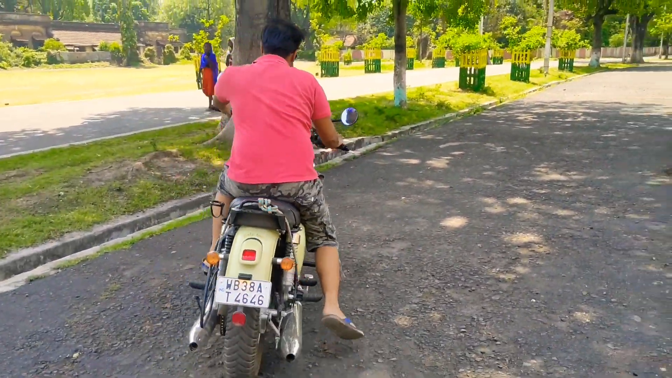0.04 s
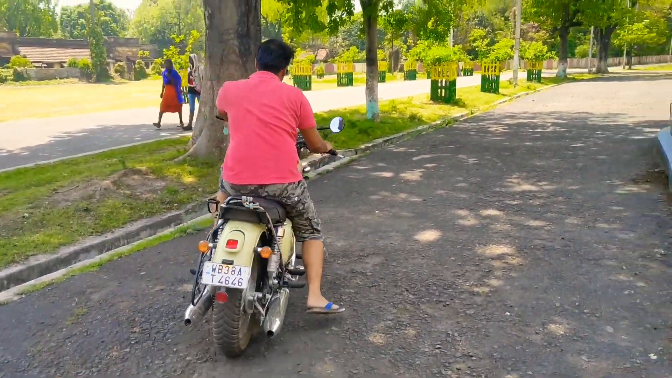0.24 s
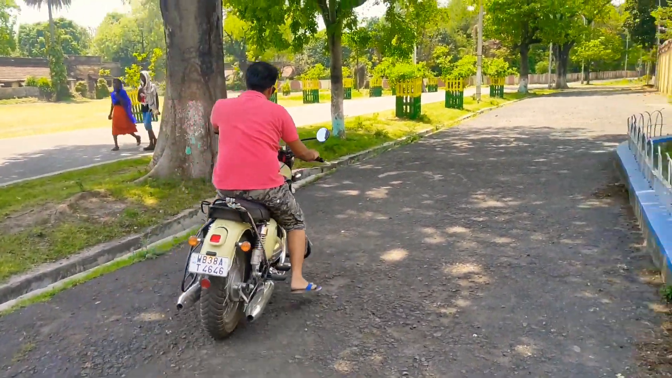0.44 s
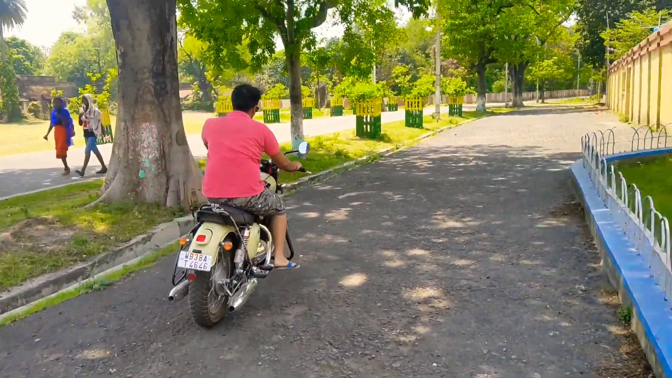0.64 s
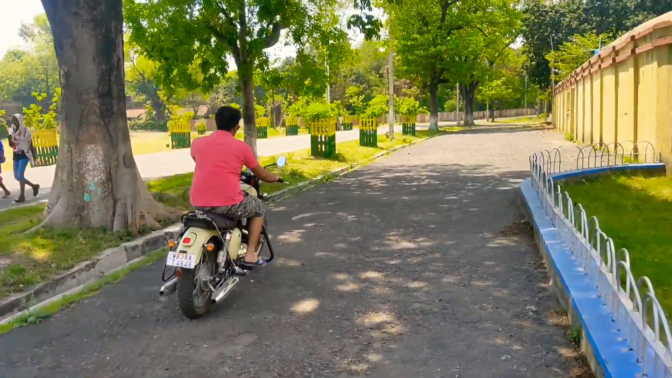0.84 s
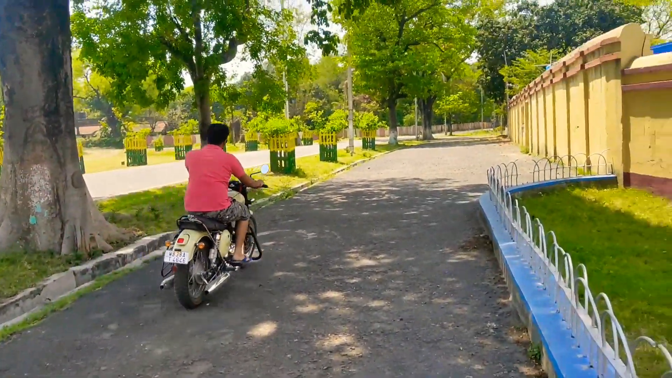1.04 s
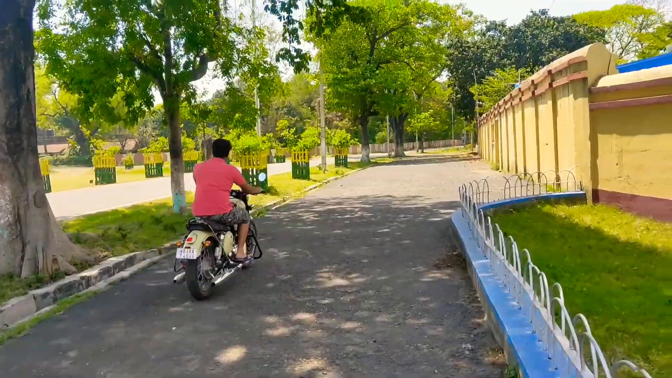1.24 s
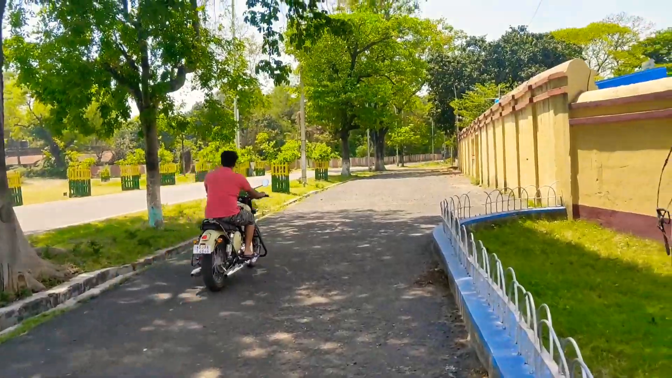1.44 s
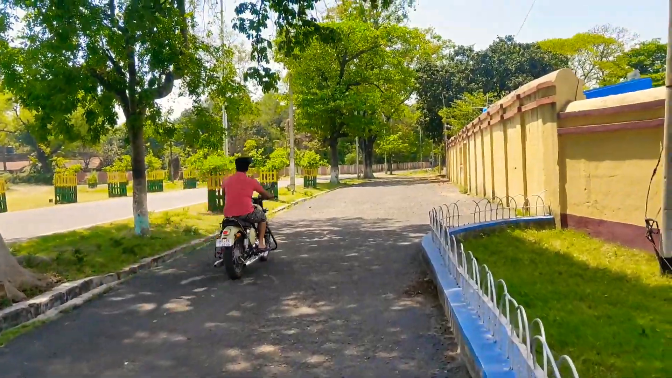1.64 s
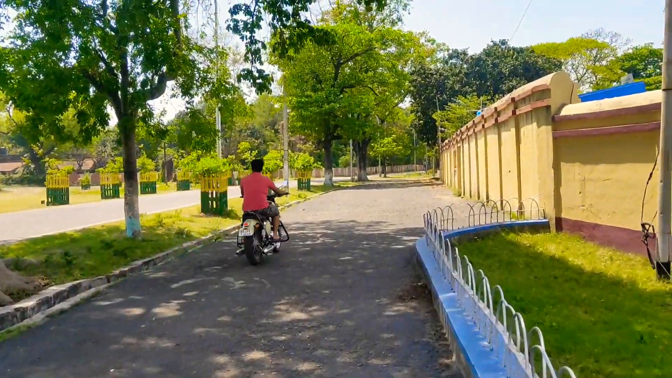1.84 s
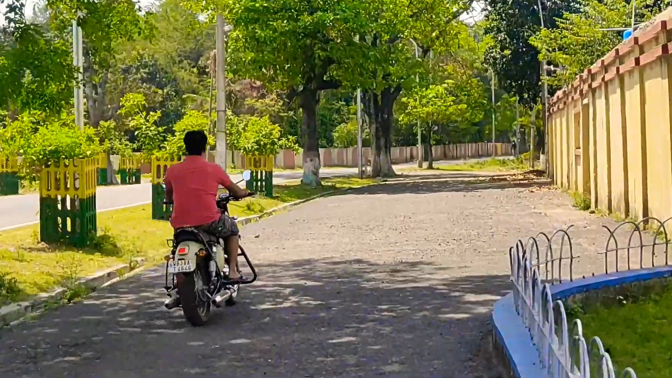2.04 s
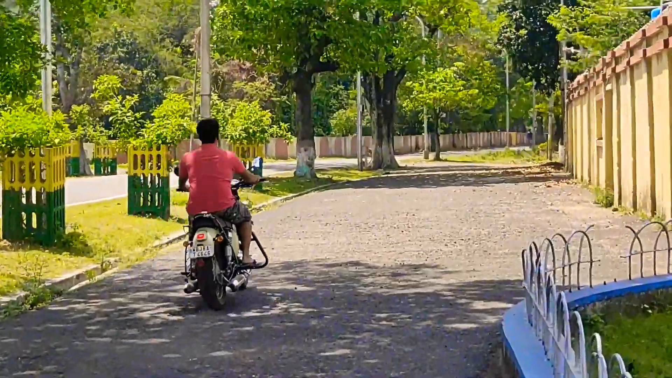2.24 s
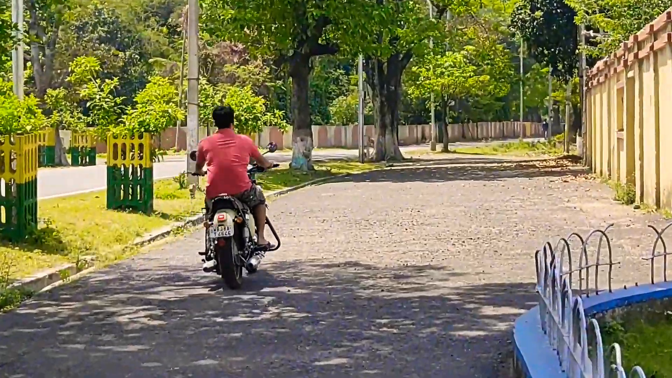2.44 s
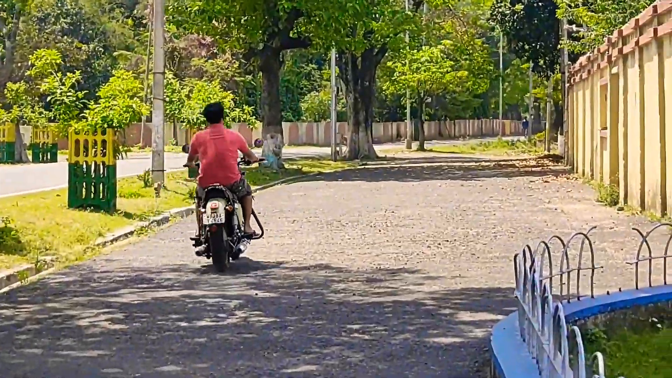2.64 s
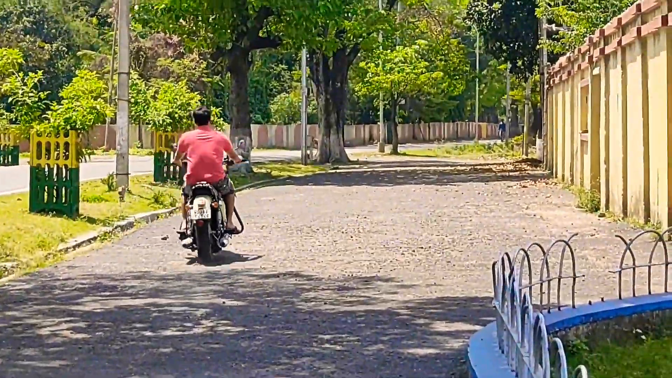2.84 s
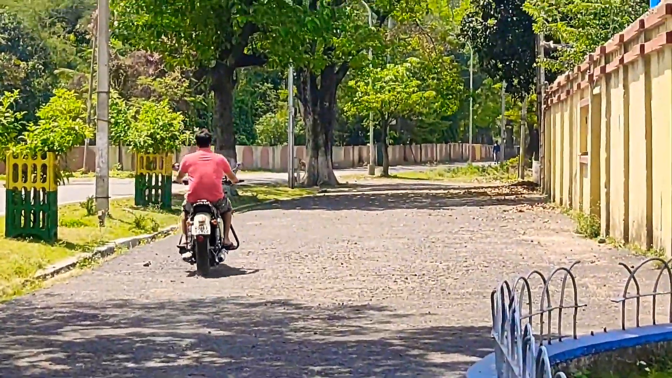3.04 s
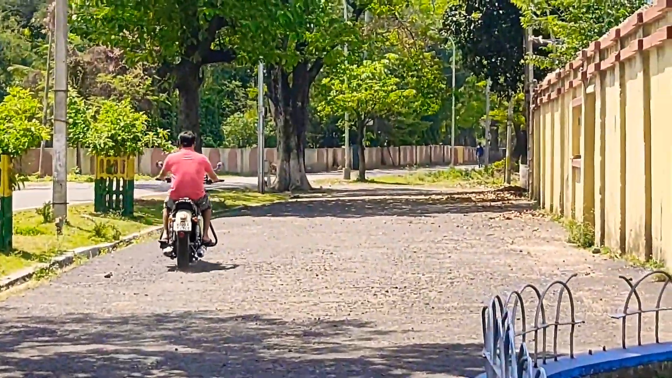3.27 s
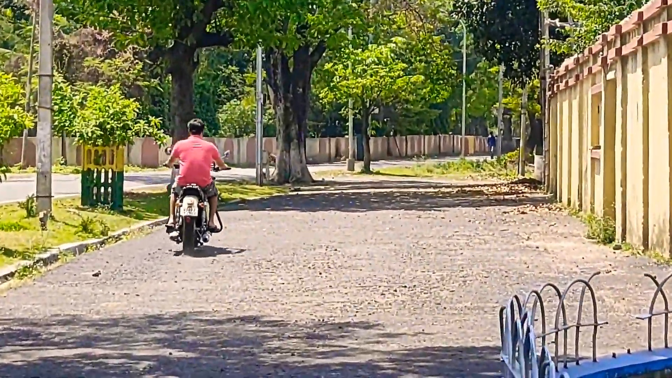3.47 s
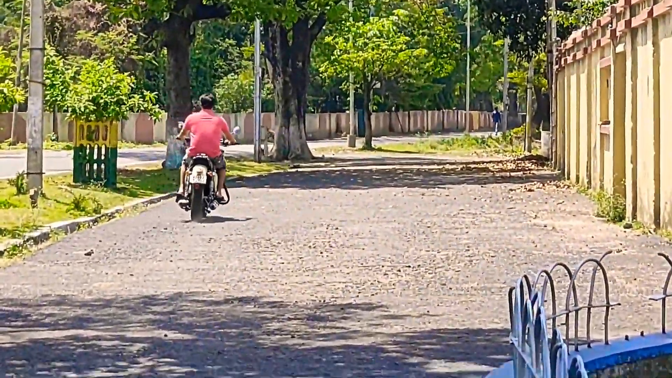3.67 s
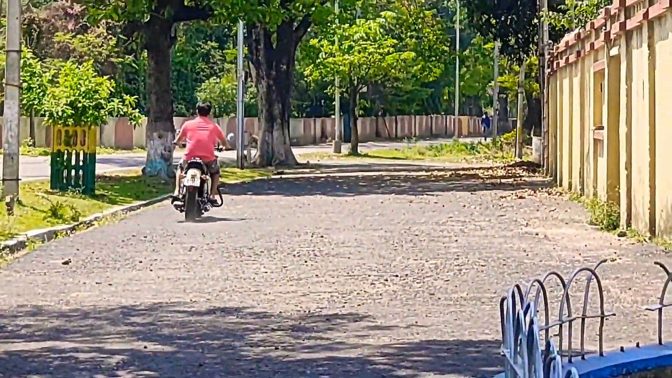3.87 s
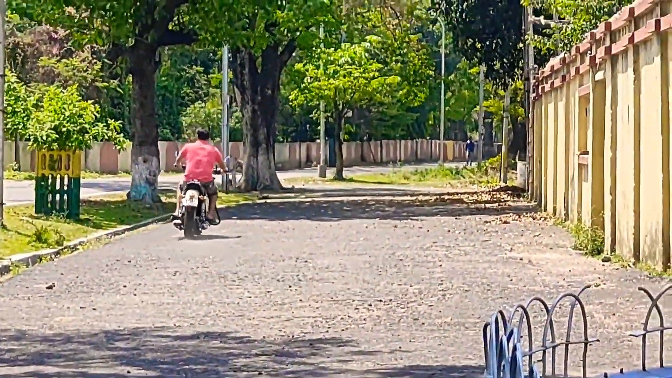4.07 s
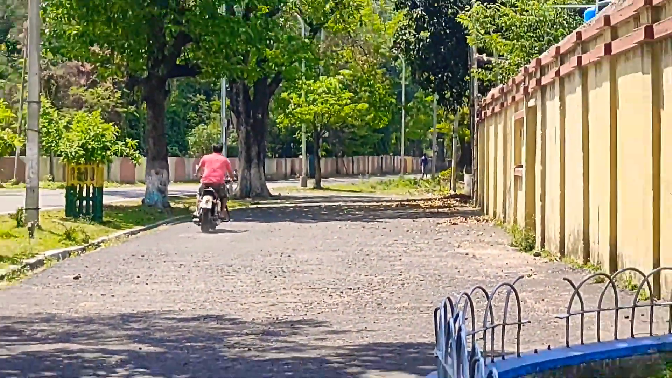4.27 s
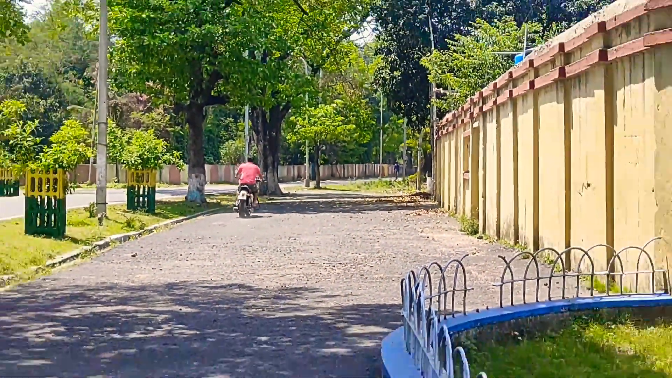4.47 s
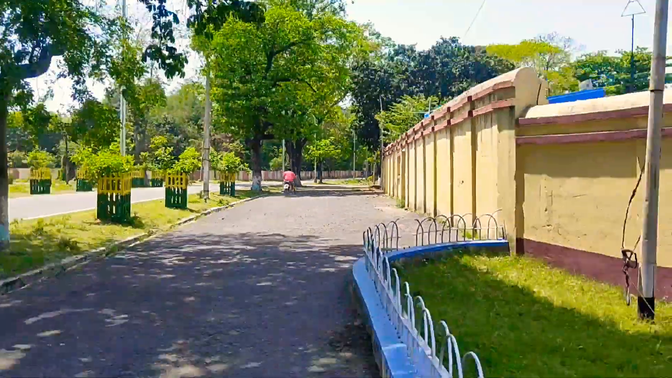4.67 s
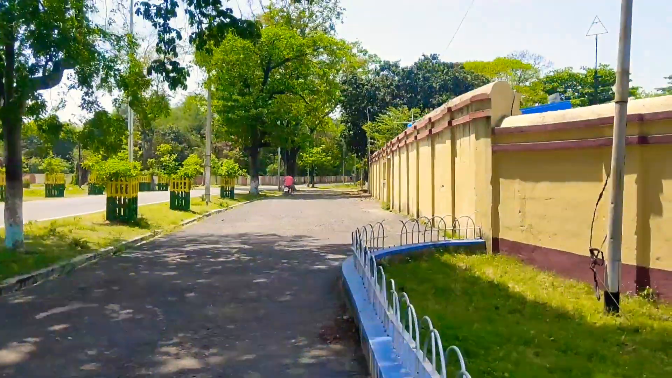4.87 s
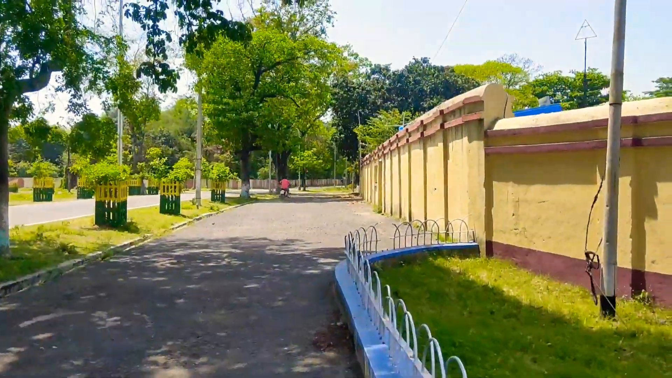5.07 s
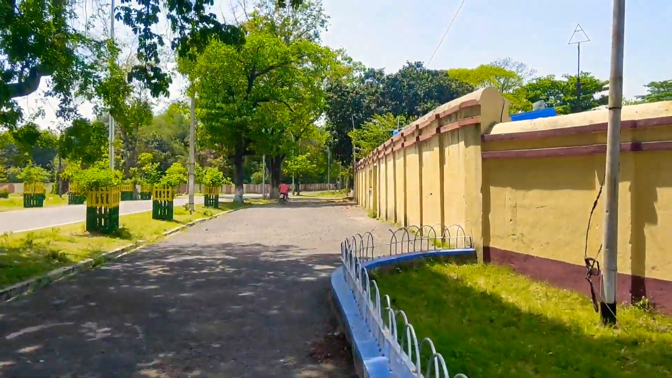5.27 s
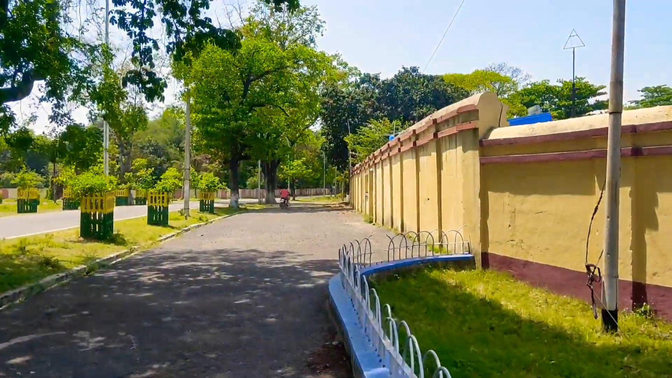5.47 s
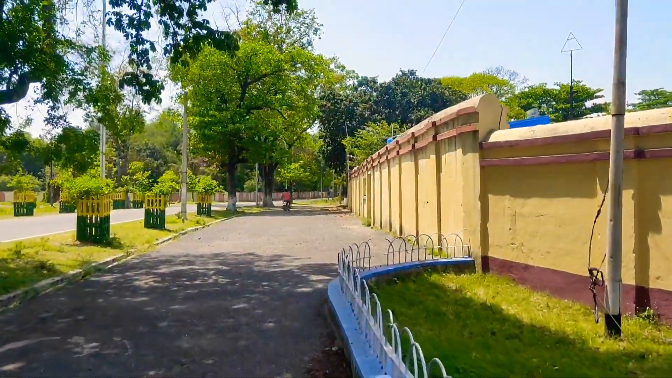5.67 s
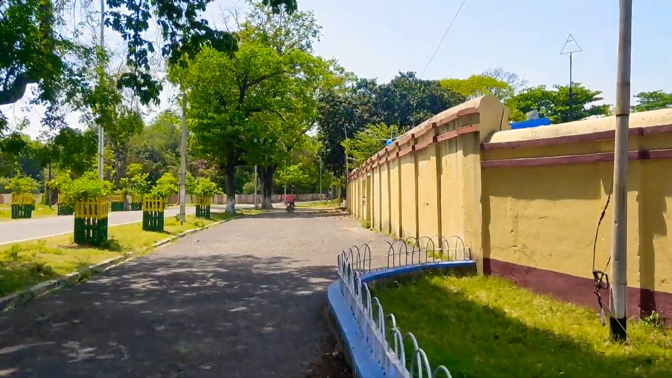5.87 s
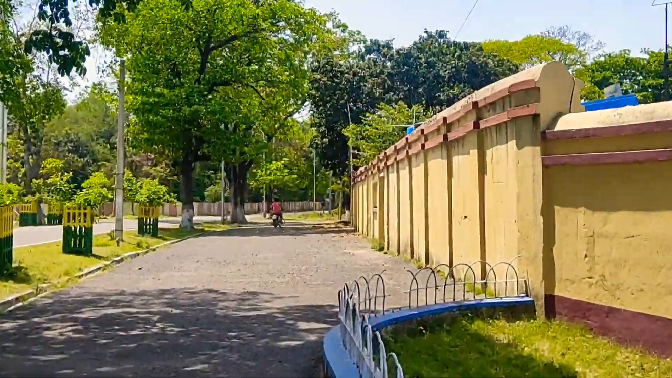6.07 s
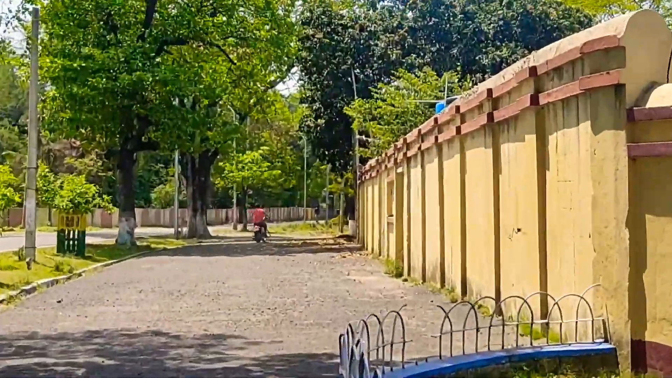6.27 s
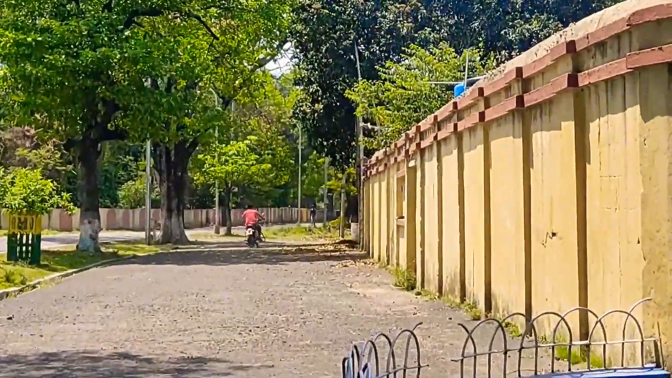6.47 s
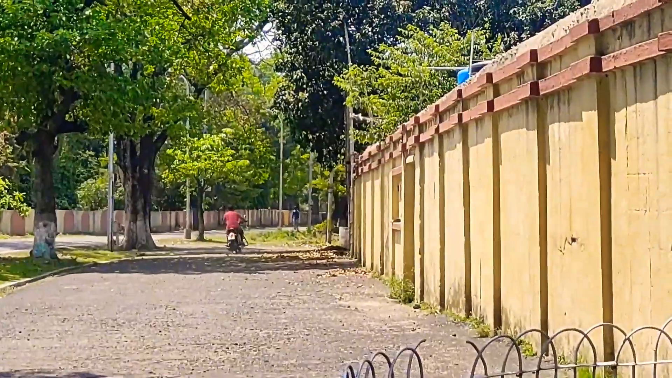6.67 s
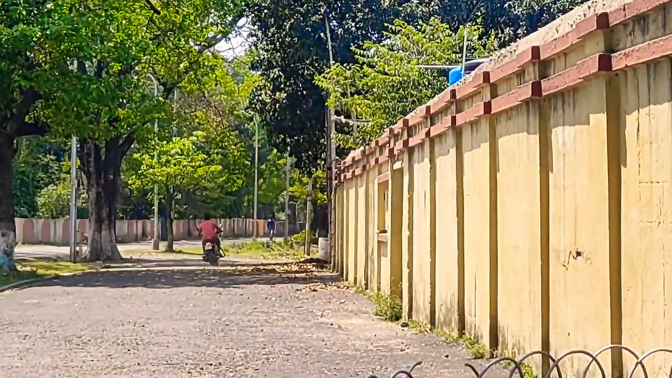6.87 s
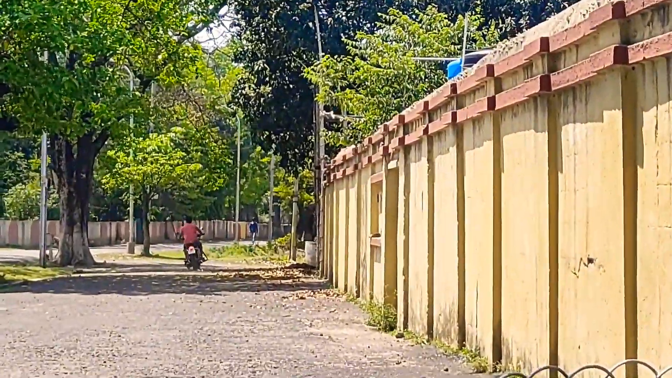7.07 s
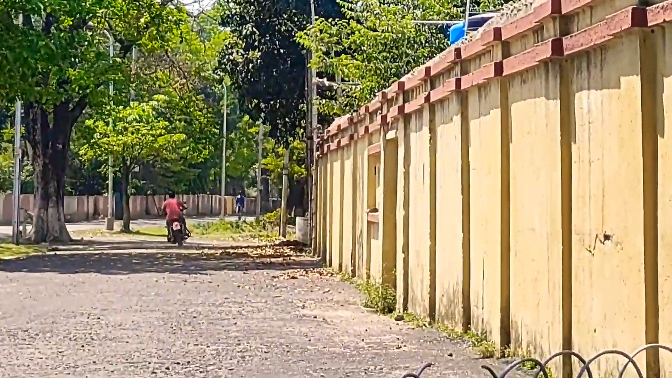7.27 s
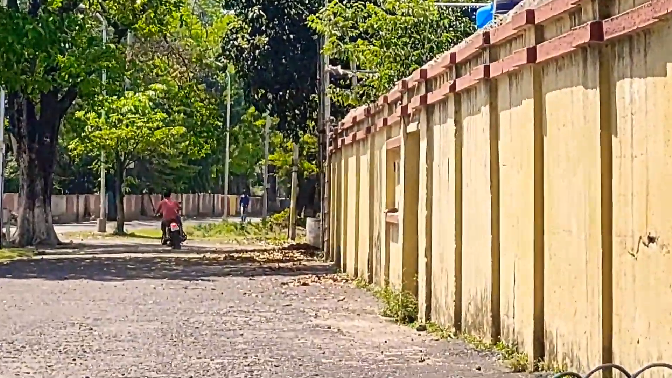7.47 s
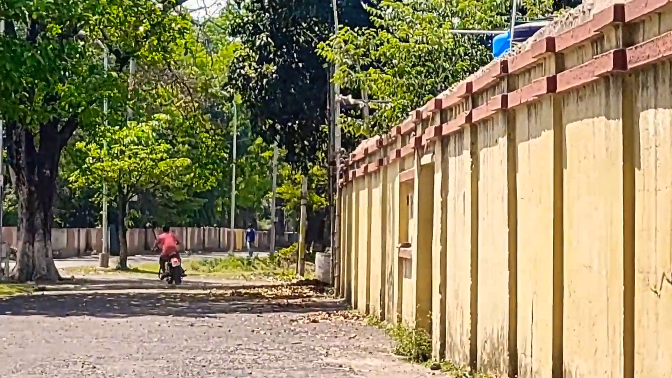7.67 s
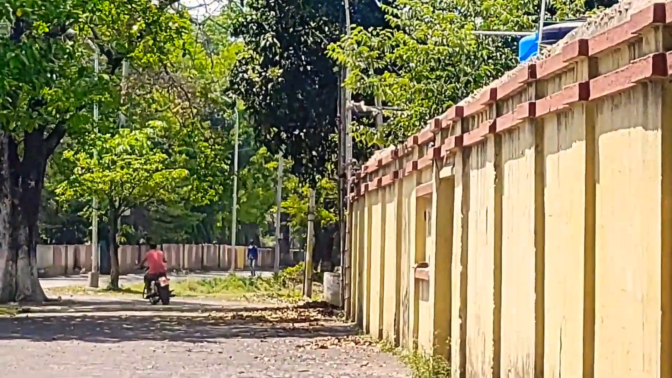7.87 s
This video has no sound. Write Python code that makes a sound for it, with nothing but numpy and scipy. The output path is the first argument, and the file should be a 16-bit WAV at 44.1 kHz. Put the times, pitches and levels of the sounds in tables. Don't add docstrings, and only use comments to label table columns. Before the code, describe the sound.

A single-cylinder motorcycle pulls away down a walled lane, deep exhaust thumps quickening then fading to distant dull pops as leaves tick nearby.

```python
import sys
import numpy as np
from scipy import signal
from scipy.fft import rfft, irfft, next_fast_len
from scipy.io import wavfile
from scipy.ndimage import uniform_filter1d, map_coordinates

SR = 44100
rng = np.random.default_rng(int(sys.argv[2]) if len(sys.argv) > 2 else 0)


def rack_gain(trim_db):
    fader = np.asarray(trim_db, float)
    return 10 ** (fader / 20)


def pcm_store(signal):
    levels = np.round(np.clip(np.atleast_2d(signal), -1, 1) * 32767)
    wavfile.write(sys.argv[1], SR, levels.astype(np.int16).T)


N = 349097
TIME = np.arange(N) / SR

# frequency in Hz, density in dB per Hz.
BREEZE_SPECTRUM = [(12, -51), (20, -27), (32, -22), (65, -9), (100, -11.5), (130, -7.5), (220, -120)]
# time in seconds, peak level in dB.
GUSTS = [(0.0, -34), (0.35, -34), (0.97, -26.5), (2.0, -25), (2.44, -28), (2.62, -28), (2.89, -20.5),
         (3.42, -25), (3.92, -31), (4.7, -32), (4.87, -31), (5.2, -31.5), (5.93, -35), (6.1, -34),
         (7.12, -35), (7.3, -34.5)]
GUST_SHAPE = (90, 29, -70)
LULL_DB, LULL_SINKS = -31.5, 1.7

# time in seconds, level in dB, 60 dB decay in seconds.
CHIRPS = [(3.659, -58, .05), (4.656, -50, 0.098), (4.9, -64, 0.056), (5.645, -56, 0.22), (5.755, -62, 0.21),
          (6.22, -82, 0.11), (6.635, -53, 0.059), (7.42, -70, 0.22), (7.66, -59, 0.22), (7.88, -68, 0.12)]

# time in seconds, peak in dB, top band in dB, 60 dB decay in seconds.
TICKS = [(6.1873, -43, -36, 0.14), (6.2141, -35, -40, 0.24), (6.616, -40, -19, 0.24),
         (6.65, -36.5, -15, 0.12), (6.673, -35.5, -16, 0.077), (6.6874, -52, -19, 0.19),
         (6.7885, -51, -37, 0.16), (6.864, -44, -36, 0.1), (7.047, -38.5, -20, 0.091),
         (7.094, -41.5, -28, 0.1), (7.116, -42, -32, 0.19), (7.226, -62, -43, 0.082),
         (7.316, -42, -31, 0.16), (7.4125, -44, -27, 0.12), (7.4779, -43, -35, 0.21),
         (7.5344, -67, -43, 0.12), (7.6086, -40.5, -30.5, 0.42), (7.6597, -42, -24, 0.11),
         (7.7336, -30, -39, 0.053), (7.816, -37.5, -33, 0.2), (7.835, -43, -37, 0.16)]
# time in seconds, level in dB.
RUSTLE = [
    (6.4, -53.5),
    (7.3, -54),
    (7.8, -53),
]
STIR_SHAPE = (77, 27, -58.5)
# frequency in Hz, density in dB per Hz.
LEAF_SPECTRUM = [(880, -67), (1650, -17), (2080, -10), (2250, -19), (2360, -9), (2860, -4), (4250, -19.5),
                 (5890, -4.5), (10300, -35), (12100, -48), (15000, -63)]

# time in seconds, peak in dB, top band in dB.
SNAPS = [(4.9535, -48, 4), (4.9605, -41, 4), (5.0955, -44, -6), (5.1478, -42, -20), (5.2317, -42, -4),
         (5.3553, -20.5, -18), (5.3585, -38, -14), (5.3725, -27, -18), (5.3745, -35, -20)]
# frequency in Hz, width in Hz.
SHELL_MODES = [
    (3000, 1700),
    (7600, 2200),
    (14900, 2000),
]

# time in seconds, level in dB.
PANEL_BUZZES = [(0.0, -21), (0.31, -24), (2.03, -29.5), (2.82, -28.5), (3.55, -28.5), (6.19, -36.5),
                (7.83, -53)]
BUZZ_SHAPE = (70, 18, -72)

# time in seconds, peak in dB.
POPS = [(7.101, -17.5), (7.165, -23), (7.225, -31.5), (7.285, -27), (7.347, -36), (7.429, -32),
        (7.479, -34), (7.546, -30), (7.612, -36), (7.694, -31), (7.774, -33), (7.854, -36)]

# time in seconds, firings per second.
FIRING = [(0.0, 25.35), (0.394, 23.21), (0.711, 27.23), (1.052, 25.96), (1.506, 28.89), (2.084, 28.65),
          (3.32, 37.33), (3.856, 39.83), (4.081, 34.48), (4.167, 38.19), (5.026, 34.29), (5.193, 39.35),
          (5.276, 34.09), (5.435, 35.48), (5.541, 30.41), (5.794, 32.67), (6.575, 28.94), (7.14, 19.89)]
# time in seconds, throttle as exhaust over engine noise in dB, ground echo as bark over boom in dB.
EXHAUST = [(0, 10, -1), (0.85, 6.5, 1), (1.02, 5.5, 11), (1.6, 5.5, 11.5), (2.3, 5.5, 5.5), (2.52, 4.5, 28),
           (2.96, 4, 13), (3.45, 6, 19), (3.9, 3.5, 35), (4.03, 3.5, -1), (4.4, 4, 0.5), (4.66, 6.5, -12),
           (5.07, 4, -8.5), (5.15, 1, -3), (5.46, 1, -5.5), (5.56, 6.5, -19.5), (6.25, 10.5, -18.5),
           (6.9, 10.5, -9)]
# time in seconds, level in dB.
AWAY = [(0, -0.5), (0.8, -1), (1.65, -4), (2.55, -6.5), (3.6, -9), (3.95, -12.5), (5.0, -16.5),
        (6.1, -21.5), (7.0, -27), (7.92, -40)]
# frequency in Hz, density in dB per Hz.
BODY_SPECTRUM = [(240, -5), (400, -4.5), (474, -2), (651, -2.5), (763, -0.5), (922, -9.5), (1160, -8),
                 (1360, -2.5), (1560, -5.5), (1710, -9), (1850, -7), (2480, -10), (2690, -6), (2950, -12.5),
                 (3400, -12.5), (3700, -20), (5590, -26.5), (9460, -120)]
# frequency in Hz, density in dB per Hz.
FAR_BODY_SPECTRUM = [(180, -45), (300, -14), (409, -19.5), (594, -16.5), (753, -1), (900, -20), (956, -8),
                     (1040, -8.5), (1090, -7), (1490, -13), (2000, -11), (2600, -6.5), (4400, -120)]
# frequency in Hz, density in dB per Hz.
GAS_SPECTRUM = [(2350, -56), (4000, -8.5), (4690, -7), (5990, 1), (6710, -3.5), (8050, -17.5), (11000, -20),
                (12500, -28), (14900, -22.5), (15600, -56)]
ROAR_DB, HISS_DB, HISS_FADES = -22, -32.5, 1.46
THROB, THROB_FADES = 0.76, 1.54

# (Hz, width Hz)
BOOM, BARK = (133.6, 38), (196, 133)
FAR_BOOM = (115.5, 59)
RING = (252, 85)
UPPER = (390, 99)
IDLE = (140, 90)

# delay in seconds, level in dB.
WALLS = [
    (.009, -19),
    (.021, -23.5),
    (0.033, -23),
]
# frequency in Hz, 60 dB decay in seconds.
LANE_DECAY = [(60, 0.25), (300, 0.35), (1000, 0.083)]
# time when passed in seconds, echo level in dB.
CORNERS = [
    (3.4, -13.5),
    (3.65, -9),
]

# frequency in Hz, left-right likeness from 0 to 1.
ALIKE = [(400, .92), (850, .9), (1100, .5), (2000, .35), (2800, .2), (5000, .35), (8000, .3)]
# frequency in Hz, left minus right in dB.
TILT = [(60, 0.0), (130, 0.0), (290, 1.0), (640, 0.5), (1410, 3.0), (3100, 4.0), (6820, -1.0), (15000, 0.0)]
LAG_LOW, LAG_HIGH = 0.00015, 0.000229
# frequency in Hz, level in dB.
AUDIBLE = [(4000, -115), (6500, -99), (7600, -96), (8800, -95), (10000, -99), (12000, -103), (14000, -102),
           (15500, -95)]
# frequency in Hz, level in dB.
HEARING = [(7500, -112), (9300, -103), (10500, -97), (15500, -93)]


def unit(x):
    return x / np.sqrt(np.mean(x ** 2) + 1e-20)


def along(points, hz):
    f, v = np.transpose(points)
    return np.interp(np.log(hz + 1), np.log(f + 1), v)


def curves(rows):
    s, *cols = np.transpose(rows)
    return [np.interp(TIME, s, c) for c in cols]


def ramp(start_s, length_s):
    return np.clip((TIME - start_s) / length_s, 0, 1)


def swells(rows, shape):
    rise, fall, calm_db = shape
    levels = [calm_db + 0 * TIME]
    for s, db in rows:
        levels.append(db - np.where(TIME < s, rise * (s - TIME), fall * (TIME - s)))
    return np.max(levels, axis=0)


def wobble(rate):
    return map_coordinates(rng.standard_normal(int(N * rate / SR) + 4), [TIME * rate])


def steady(x):
    power = uniform_filter1d(np.mean(x ** 2, axis=0), size=SR // 6)
    return x / np.sqrt(np.abs(power) + 1e-14)


def filtered(x, response):
    m = next_fast_len(N + SR // 2)
    return irfft(rfft(x, m) * response(np.fft.rfftfreq(m, 1 / SR)), m)[..., :N]


def resonance(f, mode):
    c, w = mode
    return 1j * f * w / (c * c - f * f + 1j * f * w)


def rush(spectrum, alike, patchy_db):
    z = signal.stft(rng.standard_normal((2, N)), nperseg=512)[2]
    field = uniform_filter1d(rng.standard_normal(z.shape[1:]), size=4, axis=0)
    field = uniform_filter1d(field, size=8, axis=1)
    pair = signal.istft(z * rack_gain(patchy_db * unit(field)), nperseg=512)[1][:, :N]

    def colour(hz):
        turn = np.arccos(np.clip(along(alike, hz), -1, 1)) / 2
        return rack_gain(along(spectrum, hz)) * [np.cos(turn), np.sin(turn)]

    mid, side = filtered(pair, colour)
    return unit(np.array([mid + side, mid - side]))


def breeze():
    lumps = rack_gain(2.5 * np.array([wobble(7), wobble(7)]) + 1.5 * wobble(5))
    buffets = steady(lumps * rush(BREEZE_SPECTRUM, [(30, 0.44), (90, 0.23)], patchy_db=2.5))
    level_db = np.maximum(swells(GUSTS, GUST_SHAPE), LULL_DB - LULL_SINKS * TIME)
    return rack_gain(level_db - 4.5) * buffets


def insect():
    level = 0
    for s, db, t60 in CHIRPS:
        level = level + rack_gain(db - 60 * np.abs(TIME - s) / np.where(TIME > s, t60, .01))
    rasp = [(11300, -50), (11800, -3), (12300, 0), (12900, -50)]  # (Hz, dB per Hz)
    return level * rush(rasp, [(12000, .4)], patchy_db=2)


def leaves():
    low, top, t = np.zeros(N + SR), np.zeros(N + SR), TIME[:SR // 3]
    for s, db, top_db, t60 in TICKS:
        fade = rack_gain(db - 7.0 - 60 * t / max(t60, .003)) + rack_gain(db - 4.5 - 60 * t / 0.013)
        start = round((s + .0015) * SR)
        low[start:][:len(t)] += fade
        top[start:][:len(t)] += fade * rack_gain(top_db)
    low = uniform_filter1d(low[:N], size=24)
    rustle_db = swells(RUSTLE, STIR_SHAPE) + 2.5 + 3 * wobble(70)
    low = low + rack_gain(rustle_db) * ramp(5.8, .3)
    bright = rush([(7000, -40), (9500, 0), (15500, 0)], [(9000, .3)], patchy_db=2)
    return low * rush(LEAF_SPECTRUM, [(2000, 0.07)], patchy_db=1.0) + top[:N] * bright


def case():
    out = 0
    for mode, top_share in zip(SHELL_MODES, (0, .7, 1)):
        blows = np.zeros(N)
        for s, db, top_db in SNAPS:
            blows[round(s * SR)] = rack_gain(db + top_share * top_db) * SR / (2 * np.pi * mode[1])
        out = out + filtered(blows, lambda f: 2.5 * resonance(f, mode) ** 2)
    return np.array([np.roll(out, -round(LAG_HIGH * SR)), out])


def panel():
    spectrum = [(640, -11.5), (740, 5.0), (795, 12.5), (850, -1.0), (950, -46)]  # (Hz, dB per Hz)
    return rack_gain(swells(PANEL_BUZZES, BUZZ_SHAPE) - 9.0) * rush(spectrum, ALIKE, patchy_db=0.5)


def scattered(x):
    out, step = np.zeros((2, N + 2 * SR)), SR // 3
    for start in range(-step, N, step):
        hz, t, z = signal.stft(rng.standard_normal((2, step)), SR, nperseg=1024)
        decay = rack_gain(-60 * t / along(LANE_DECAY, hz)[:, None])
        a, b = signal.istft(z * decay, SR, nperseg=1024)[1]
        tail = np.array([a + 0.85 * b, a - 0.053 * b]) / np.linalg.norm(a)
        piece = np.pad(x, (step, 2 * step))[start + step:][:2 * step] * np.hanning(2 * step)
        answer = signal.fftconvolve(piece[None], tail, axes=1)
        out[:, start + step:][:, :answer.shape[1]] += answer
    return out[:, step:][:, :N]


def thumps(kicks, mode, puff_s):
    def pipe(f):
        puff = np.exp(-(np.pi * f * puff_s) ** 2)
        open_end = f ** 4 / ((0.54 * mode[0]) ** 4 + f ** 4)
        return puff * resonance(f, mode) * open_end

    return filtered(kicks, pipe)


def coasting():
    kicks = np.zeros(N)
    for s, db in POPS:
        kicks[round(s * SR) + 110] = -rack_gain(db)
    pops = 220 * thumps(kicks, IDLE, puff_s=.0018)
    return pops + rack_gain(-5) * scattered(pops)


def firings():
    cycles = -.185 + np.cumsum(curves(FIRING)[0]) / SR
    at = np.flatnonzero((np.diff(np.floor(cycles)) > 0) & (TIME[1:] < 7.04))
    size, slip = rng.standard_normal((len(at), 2)).T
    far = TIME[at] / TIME[-1]
    place = at + slip * (.0001 + .0002 * far) * SR
    kicks = np.zeros(N)
    kicks[np.clip(place, 0, N - 1).astype(int)] = rack_gain(size * (.6 + 2.5 * far ** 3))
    return kicks


def bursts(kicks, rise_s, fall_s):
    t = TIME[:SR // 10]
    onset = (t / rise_s) ** 2
    shape = np.exp(-t / fall_s) * onset / (1 + onset)
    return steady(signal.fftconvolve(kicks, shape)[None, :N])


def roar(kicks):
    away_db, = curves(AWAY)
    throb = np.clip(THROB * rack_gain(THROB_FADES * away_db), 0, 1)
    gone = ramp(6.2, 0.71)
    body = np.sqrt(1 - gone) * rush(BODY_SPECTRUM, ALIKE, patchy_db=1.26)
    body = body + rack_gain(-2.0) * np.sqrt(gone) * rush(FAR_BODY_SPECTRUM, ALIKE, patchy_db=3.5)
    band = filtered(body, lambda f: resonance(f, (600, 370)))
    body = body - 0.53 * (1 - ramp(1.2, 1.5)) * band
    body = (1 - 0.66 * throb + 0.43 * throb * bursts(kicks, 0.0044, 0.0051)) * body
    hiss = (1 - throb + throb * bursts(kicks, .005, .005)) * rush(GAS_SPECTRUM, ALIKE, patchy_db=3)
    return rack_gain(ROAR_DB + away_db) * body + rack_gain(HISS_DB + HISS_FADES * away_db + 2) * hiss


def corners(x):
    start, end, fade = 0.96, 2.9, 0.49
    closing = 0.012
    heard = np.clip(np.minimum(TIME - start, end - TIME) / fade, 0, 1)
    x = filtered(x, lambda f: np.exp(-(f * 0.0029) ** 4))
    return heard * sum(rack_gain(db) * np.interp(TIME - closing * (s - TIME), TIME, x) for s, db in CORNERS)


def exhaust(kicks):
    throttle_db, echo_db = curves(EXHAUST)
    boom_db = ROAR_DB + curves(AWAY)[0] + throttle_db - 10 * np.log10(1 + rack_gain(2 * echo_db))
    bark_db = boom_db + echo_db
    heard = kicks + sum(rack_gain(db) * np.roll(kicks, round(s * SR)) for s, db in WALLS)

    def voice(mode, puff_s):
        return steady(thumps(heard, mode, puff_s)[None])

    away = ramp(3.6, 1.2)
    boom = (1 - away) * voice(BOOM, 0.0017) + away * voice(FAR_BOOM, 0.0017)
    soft = ramp(0.93, 0.73)
    wide = (1 - soft) * voice(BARK, 0.00079) + soft * voice(BARK, 0.0013)
    ringing = steady(thumps(thumps(heard, RING, puff_s=0.001), RING, puff_s=0)[None])
    narrow = 0.65 * ramp(2.36, 1.29)
    bark = steady((1 - narrow) * wide + narrow * ringing)
    upper = ramp(2.35, .5) * voice(UPPER, 0.00074)

    direct = rack_gain(boom_db) * boom + rack_gain(bark_db) * bark + rack_gain(bark_db - 16.5) * upper
    direct = direct * (1 - ramp(7.06, .03))
    direct = direct + corners(direct[0])
    wet = .06 * ramp(1.0, .9) + np.clip(.1 * (4 - throttle_db), 0, .5)
    return np.sqrt(1 - wet) * direct + np.sqrt(wet) * scattered(direct[0])


def scene():
    kicks = firings()
    surroundings = breeze() + insect() + leaves() + case()
    return surroundings + panel() + coasting() + roar(kicks) + exhaust(kicks)


def without_faint_bands(x):
    hz, _, z = signal.stft(x, SR, nperseg=2048)
    bands = (np.abs(z[:, :1024]) ** 2).reshape(2, 64, 16, -1).mean(axis=(0, 2))
    band_hz = hz[8:1024:16]
    loud_db = np.clip(10 * np.log10(2 * bands.sum(axis=0) + 1e-12), -55, -31)
    loud_db = uniform_filter1d(loud_db, size=5)
    whim = unit(uniform_filter1d(rng.standard_normal(bands.shape), size=2, axis=1))
    limit_db = along(AUDIBLE, band_hz)[:, None] + 1.2 * (loud_db + 45)
    limit_db = np.maximum(limit_db, along(HEARING, band_hz)[:, None]) + 2.5 * whim
    z[:, :1024] *= np.repeat(bands > rack_gain(2 * limit_db), 16, axis=0)
    return signal.istft(z, SR, nperseg=2048)[1][:, :N]


def ports(dry):
    side = np.array([[.5], [-.5]])

    def response(hz):
        lag = along([(700, LAG_LOW), (1100, LAG_HIGH)], hz)
        turn = np.exp(-2j * np.pi * hz * side * lag)
        return rack_gain(side * along(TILT, hz)) * turn * (hz < 15700)

    return filtered(dry, response)


def low_pass(x):
    return signal.sosfilt(signal.butter(12, 15700, fs=SR, output="sos"), x)


def record(dry):
    x = ports(dry)
    x = x / (1 + np.abs(x / 1.05) ** 8) ** (1 / 8)
    return low_pass(without_faint_bands(x))


dry = scene()
out = record(dry)
pcm_store(out)
```